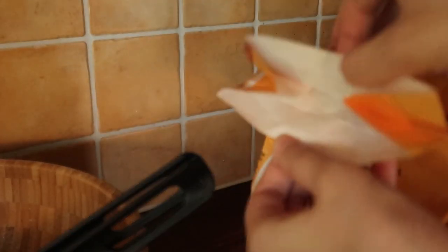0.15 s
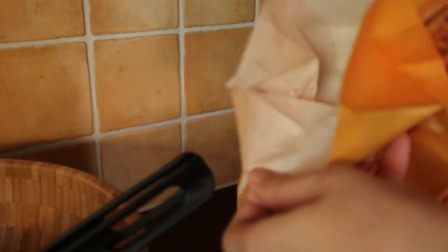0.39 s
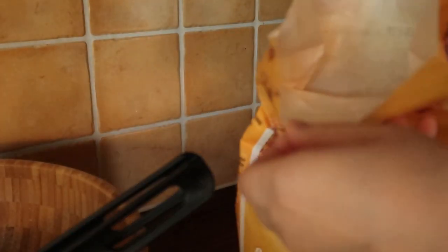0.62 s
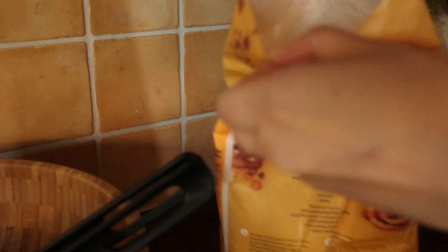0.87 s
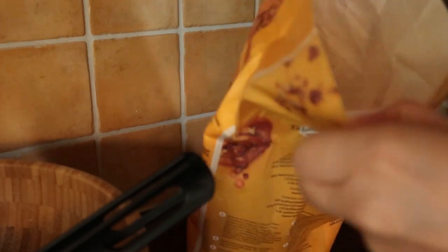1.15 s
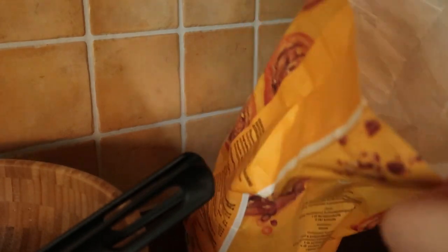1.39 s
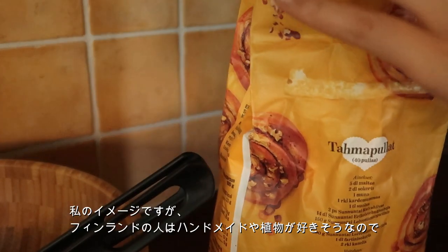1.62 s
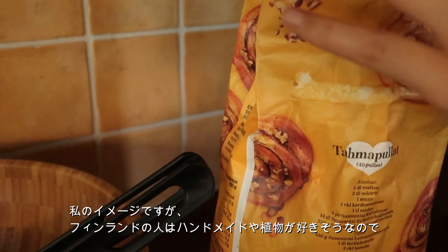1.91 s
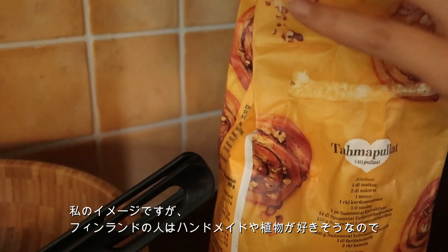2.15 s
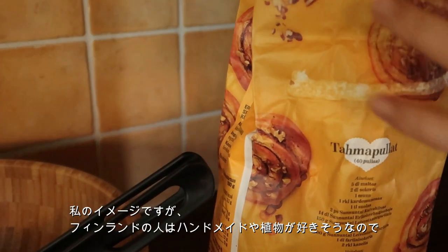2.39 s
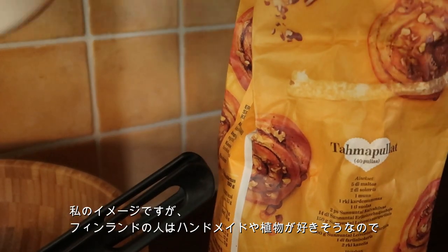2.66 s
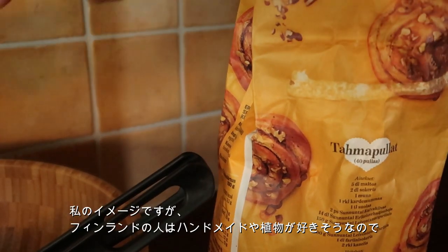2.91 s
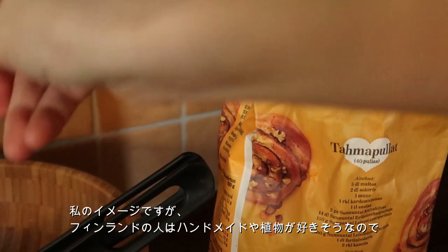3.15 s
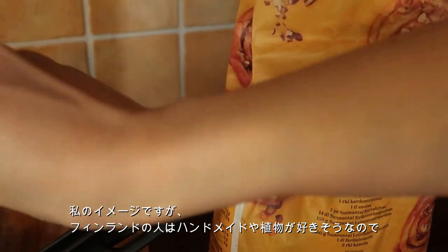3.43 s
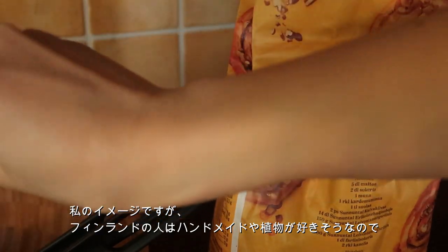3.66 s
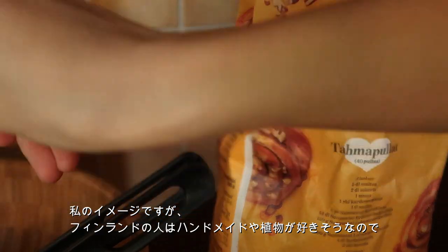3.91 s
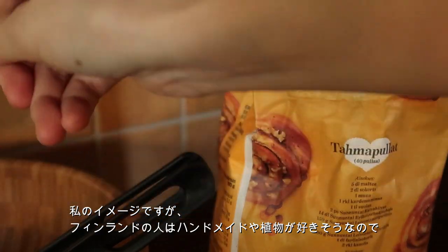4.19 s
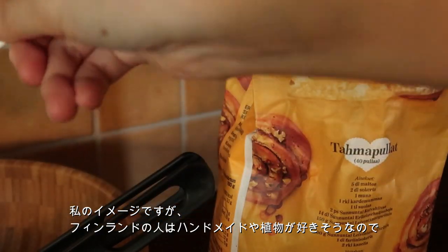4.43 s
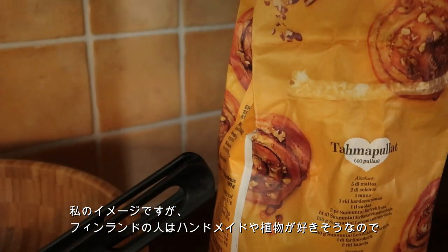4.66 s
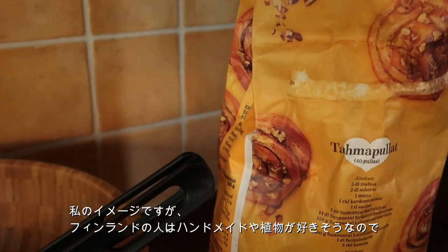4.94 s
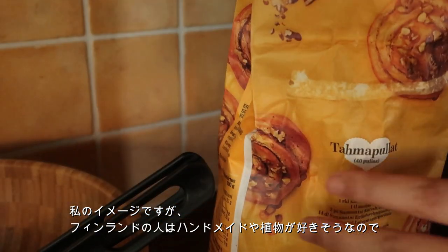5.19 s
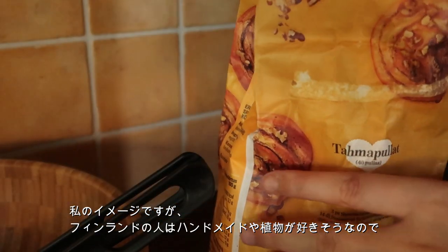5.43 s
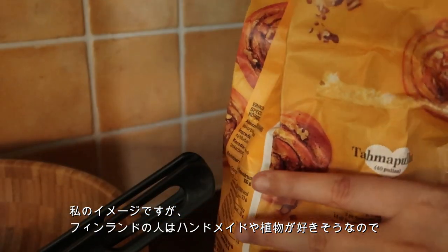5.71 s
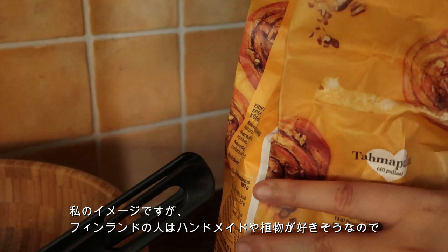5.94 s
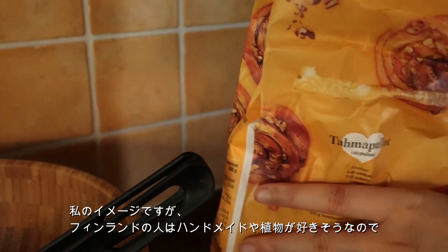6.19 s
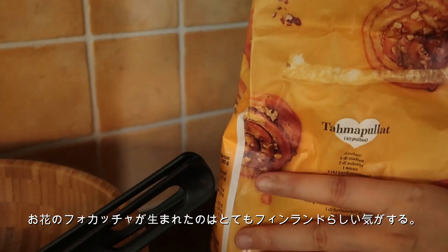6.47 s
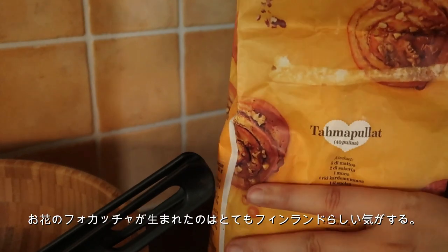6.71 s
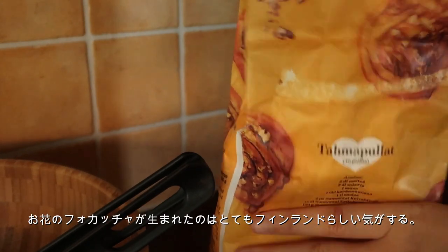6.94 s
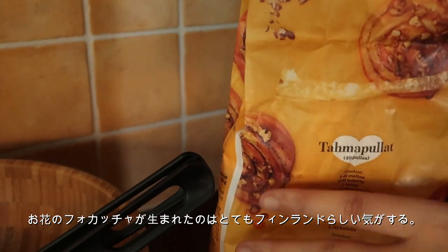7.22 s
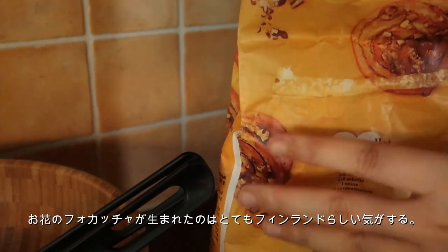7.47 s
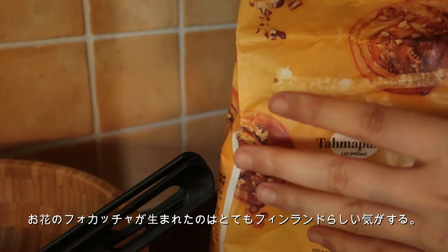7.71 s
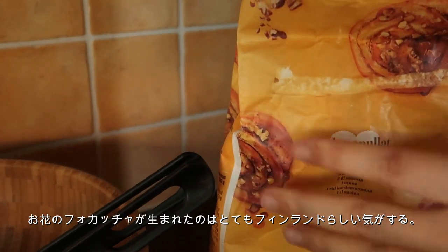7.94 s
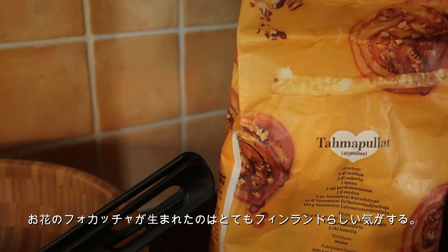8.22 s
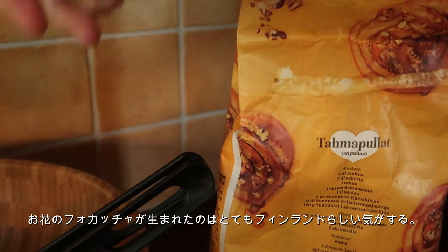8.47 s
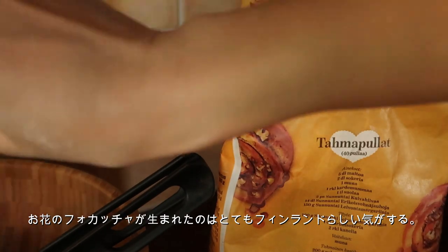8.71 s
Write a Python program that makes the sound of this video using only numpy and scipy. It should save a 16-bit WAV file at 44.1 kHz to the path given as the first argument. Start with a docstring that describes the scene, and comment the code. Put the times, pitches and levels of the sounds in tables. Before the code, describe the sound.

Crisp paper bag rustling with soft worktop knocks, a faint metal rattle, a quiet lull, renewed crackling and a short scoop scrape in a humming kitchen.

```python
"""Throughout, an appliance hums under microphone hiss in a small tiled kitchen: sines over bands of noise.
From the start, hands open, pat and squeeze a stiff paper flour bag close by: noise bursts and ringing
panels for the creases, clicked modes for the crackle, narrow noise for skin on paper. Soft knocks go
through the worktop as decaying sines; past 2 s a metal utensil rattles faintly, then a lull, and from
5 s the bag is worked again. From 8 s a scoop is scraped: friction noise through resonances."""
import sys
import numpy as np
from scipy import signal
from scipy.io import wavfile

SR = 44100
rng = np.random.default_rng(int(sys.argv[2]) if len(sys.argv) > 2 else 0)


def file_out(sig):
    """Save sig as 16-bit WAV at sys.argv[1]."""
    # one column per channel
    cols = np.atleast_2d(sig).T
    # limit, then scale
    lim = np.clip(cols, -1, 1)
    pcm = np.round(lim * 32767).astype(np.int16)
    wavfile.write(sys.argv[1], SR, pcm)


def invert_db(level):
    """Linear amplitude ratio for a level in decibels (20 dB per decade), elementwise."""
    return 10 ** (np.asarray(level, dtype=float) / 20)


N = 390285


def rms_one(x):
    """Scale to unit rms."""
    return x / np.sqrt(np.mean(x ** 2) + 1e-20)


def in_time(rows):
    """Columns of a curve table at every sample, -120 dB outside it."""
    s, *columns = np.transpose(rows)
    t = np.arange(N) / SR
    return np.array([np.interp(t, s, column, left=-120, right=-120) for column in columns])


def at_hz(points, hz):
    """Read a table on a log-frequency axis."""
    table_hz, values = np.array(points).T
    return np.interp(np.log(hz), np.log(table_hz), values)


def drift(rate_hz):
    """Slow random wander of rms 1: noise through a double pole, run at every 40th sample."""
    r = np.exp(-80 * np.pi * rate_hz / SR)
    white = rng.standard_normal(N // 40 + 2002)
    slow = signal.lfilter([1], [1, -2 * r, r * r], white)[2000:]
    return np.interp(np.arange(N) / 40, np.arange(len(slow)), rms_one(slow))


def dying(power, t60_s):
    """Each burst of power fades by 60 dB in t60_s."""
    return signal.lfilter([1], [1, -invert_db(-120 / (t60_s * SR))], power + 1e-18)


def ring(clicks, hz, t60_s):
    """A unit click sets a decaying sine of height 1 ringing."""
    r, w = invert_db(-60 / (t60_s * SR)), 2 * np.pi * hz / SR
    return signal.lfilter([0, np.sin(w)], [1, -2 * r * np.cos(w), r * r], clicks + 1e-18)


def across(hz, sub, boom, body, crisp, sizzle, top):
    """Level at one pitch, between levels given from the deepest range to the highest."""
    centres_hz = [55, 170, 900, 3800, 9000, 15000]
    weights = [np.interp(np.log(hz), np.log(centres_hz), row) for row in np.eye(6)]
    return np.dot(weights, [sub, boom, body, crisp, sizzle, top])


def banded(envelope_at, side_table):
    """Half-octave bands of noise, each under its own envelope, with a side signal of its own."""
    out, white = 0, rng.standard_normal((2, 2, N))
    edges_hz = 28 * 2 ** np.arange(0, 9.1, 1 / 2)
    for k, (low_hz, high_hz) in enumerate(zip(edges_hz, edges_hz[1:])):
        hz = np.sqrt(low_hz * high_hz)
        unit = np.sqrt(SR / 2 / (high_hz - low_hz))     # rms 1 in every band
        band = signal.butter(2, [low_hz, high_hz], "band", fs=SR, output="sos")
        mid, side = signal.sosfilt(band, unit * white[k % 2] * envelope_at(hz))
        out = out + mid + invert_db(at_hz(side_table, hz)) * side * [[1], [-1]]
    return out


# Air and hiss spectrum. Each row: frequency in Hz, relative density in dB.
ROOM_TONE = [(15, -43), (25, -4.5), (53, -12.5), (69, -7), (101, -3.5), (126, -4.5), (156, 1), (173, -17),
             (193, -2), (331, -6), (359, -2.5), (482, -14.5), (722, -12), (5880, -26), (15500, -48.5)]
# Stereo width of room tone. Each row: frequency in Hz, side relative to mid in dB.
FAR_SIDE = [(60, -29), (180, -7.5), (550, 0), (1650, 0.5), (4970, 0), (15000, 1.5)]
# Steady hum lines. Each row: frequency in Hz, level in dB.
HUM = [(49.7, -62.5), (149, -65.5), (200, -69), (362, -68.5)]
# Swelling hum line. Each row: time in seconds, level in dB.
DRONE = [(0, -57.5), (2.4, -65), (2.8, -61), (3.4, -63), (4.0, -58), (5.1, -57.5), (5.6, -60), (8.86, -65)]


def room_tone(level_db=-56, drone_hz=103.3):
    """Air and microphone hiss as noise bands; appliance hum as sines wavering in level and phase."""
    def envelope_at(hz):
        """Density times root of frequency gives a half-octave level."""
        return invert_db(at_hz(ROOM_TONE, hz) + 1.0 * drift(6.1)) * np.sqrt(hz)

    air = banded(envelope_at, FAR_SIDE)
    t = np.arange(N) / SR
    hum = 0
    for hz, line_db in HUM + [(drone_hz, in_time(DRONE)[0])]:
        level = np.sqrt(2) * invert_db(line_db + 2.6 * drift(5.0))
        hum = hum + level * np.sin(2 * np.pi * hz * t + 2.16 * drift(1.0))
    return invert_db(level_db) * air / np.std(air.mean(axis=0)) + hum


# Hands working the bag, one list a handling.
# Each row: time in seconds, crumple in dB, skin rub in dB, bag wall boom in dB.
HANDLING = [
    [(0.0, -39, -55, -49), (0.13, -51, -50, -48), (0.26, -34, -45, -45), (0.396, -37.5, -47, -52),
     (0.44, -27.5, -65, -42), (0.5, -38, -37, -47), (0.542, -34.5, -44.5, -47.5), (0.65, -42.5, -65, -45),
     (0.73, -34, -65, -37), (0.77, -32, -51, -40), (0.81, -39, -57, -32), (0.86, -30, -60, -42),
     (0.906, -27, -54, -29), (1.02, -33.5, -49, -52), (1.156, -45, -67, -41.5), (1.314, -50, -67, -52),
     (1.454, -50, -84, -51), (1.548, -47.5, -64, -43), (1.634, -50, -59, -64), (1.754, -53.5, -69, -57),
     (1.95, -68.5, -68, -67)],
    [(1.95, -42, -75, -33.5), (1.966, -59, -81, -37), (2.018, -55, -51.5, -56), (2.12, -73, -94, -56.5)],
    [(2.17, -74, -98, -73), (2.258, -49, -41, -39.5), (2.28, -60, -66, -50), (2.45, -68, -80, -74)],
    [(3.4, -95, -94, -69), (3.55, -70.5, -92.5, -57), (3.575, -53, -80, -45), (3.65, -65.5, -86, -46.5),
     (3.772, -98, -92, -59), (3.792, -63, -85.5, -70.5), (3.948, -83, -96, -59), (4.1, -82, -94.5, -78)],
    [(5.22, -75, -102, -64.5), (5.236, -71, -84, -52), (5.252, -70, -72, -48), (5.258, -55, -49, -46),
     (5.272, -59, -49, -43), (5.284, -64, -69, -57), (5.292, -50, -49, -62), (5.325, -56, -56, -54),
     (5.335, -66, -66, -56), (5.37, -78, -76, -45)],
    [(5.37, -74, -71, -54), (5.42, -42, -48, -37), (5.49, -45.5, -42, -32), (5.584, -33.5, -40.5, -37),
     (5.646, -33.5, -38, -31.5), (5.794, -32.5, -45, -40), (5.89, -40.5, -54, -44)],
    [(5.89, -42.5, -53, -53), (6.02, -32.5, -42, -48), (6.12, -31, -55, -56), (6.18, -27.5, -47.5, -25),
     (6.38, -40.5, -43.5, -50), (6.58, -40.5, -46.5, -45), (6.78, -32, -39.5, -33.5),
     (6.94, -36.5, -48, -47), (7.01, -31.5, -37.5, -35), (7.12, -30.5, -36, -36.5), (7.2, -42.5, -58, -46),
     (7.29, -50, -50.5, -50), (7.33, -53, -63, -45), (7.38, -45.5, -49.5, -45), (7.41, -46, -57, -33),
     (7.63, -40.5, -62, -49), (7.69, -37, -73, -42), (7.78, -44.5, -51.5, -36.5), (7.83, -48.5, -58, -48),
     (8.0, -69, -101, -65)],
    [(8.68, -77, -82, -70), (8.704, -62.5, -99, -61.5), (8.85, -53, -92.5, -50)],
]
HANDS = [np.max([in_time(rows)[c] for rows in HANDLING], axis=0) for c in range(3)]


def pressure_db(hz):
    """How hard the hands work the bag, as a level at one pitch through time."""
    crumple, rub, boom = HANDS
    return across(hz, boom - 14, boom - 5, crumple, .5 * (crumple + rub), rub - 3, rub - 16)


# Modes of the bag walls. Each row: frequency in Hz, width in Hz, relative level in dB.
BAG = [(204.4, 96, 7), (305, 36, 1), (418, 60, 1), (554, 93, -12), (696, 243, -6.5), (830, 65, -5),
       (980, 290, -10.5), (1200, 35, -9), (1310, 99, -6), (1510, 42, -6.5), (1800, 83, 3.5), (2040, 94, -1),
       (2400, 160, -5.5), (2746, 300, 1), (3224, 110, 2), (4066, 170, -3.5), (4600, 510, 1), (5700, 270, 1),
       (6320, 450, -22.5), (7990, 1520, -10.5), (11630, 230, 6)]
# Stereo width of the bag. Each row: frequency in Hz, side relative to mid in dB.
NEAR_SIDE = [(60, -44), (180, -59), (550, -24.5), (1650, -18), (4970, -5.5), (15000, 3)]


def crackle(crackle_db=-4, shifting_db=4):
    """Clumped small creases each strike about a third of the bag's modes, which wax and wane as it bends."""
    rate_per_s = 700 * invert_db(5 * drift(12))
    born = np.flatnonzero(rng.random(N) < rate_per_s / SR)
    sizes = invert_db(3 * np.minimum(rng.exponential(1, len(born)), 3))
    out = 0
    for hz, width_hz, mode_db in BAG:
        clicks = np.zeros((2, N))
        struck = rng.random(len(born)) < 1 / 3
        force_db = (pressure_db(hz) + shifting_db * drift(4.2))[born]
        kicks = sizes * struck * rng.standard_normal((2, len(born)))
        clicks[:, born] = kicks * invert_db(force_db + crackle_db + mode_db)
        mid, side = ring(clicks, hz, np.log(1000) / (np.pi * width_hz))
        out = out + mid + invert_db(at_hz(NEAR_SIDE, hz)) * side * [[1], [-1]]
    return out


# Fingertip strokes. Each row: start in seconds, length in seconds, level in dB.
SLIDES = [(5.253, 0.021, -54.5), (5.291, 0.039, -53), (5.43, 0.038, -49), (5.47, 0.053, -48),
          (7.36, .05, -58), (7.697, .016, -43), (7.75, .018, -47), (7.782, 0.021, -50)]


def fingertips(hz=3300, half_width_hz=180, slide_db=-17, edge_s=.003):
    """Skin sliding on coated paper excites one narrow wall mode, a little always and clearly in strokes."""
    band = signal.butter(2, [hz - half_width_hz, hz + half_width_hz], "band", fs=SR, output="sos")
    slide = rms_one(signal.sosfilt(band, rng.standard_normal(N)))
    t = np.arange(N) / SR
    strokes = 0
    for s, length_s, level_db in SLIDES:
        gate = np.clip(np.minimum(t - s, s + length_s - t) / edge_s, 0, 1)
        strokes = strokes + invert_db(level_db) * gate
    always_db = pressure_db(hz) + slide_db + 1.9 * drift(15) + 3.2 * drift(2)
    return slide * (strokes + invert_db(always_db))


# Loud creases snapping. Each row: time in seconds, body in dB, panel ring in Hz, thump in dB,
# crisp in dB, sizzle in dB.
SNAPS = [(0.158, -54, 4160, -36, -29.5, -55), (0.194, -40, 3900, -45, -28, -38),
         (0.2, -35, 775, -41, -26, -33), (0.214, -25, 1530, -24.5, -13.5, -28.5),
         (0.232, -31.5, 1220, -35, -22, -27), (0.241, -24.5, 434, -28, -12, -38),
         (0.271, -21, 1030, -20, -36, -38.5), (0.279, -43, 1120, -31, -12, -31),
         (0.315, -25, 1630, -51, -32, -52), (0.320, -15, 2000, -54, -25.5, -52),
         (0.337, -23, 1080, -46, -21, -25), (0.402, -30, 700, -38, -40, -55),
         (0.405, -36, 3220, -33, -34, -56), (0.428, -17.5, 404, -27, -18.5, -40.5),
         (0.459, -28.5, 1740, -24.5, -20, -50), (0.464, -8.5, 915, -37, -16, -31),
         (0.477, -22, 1660, -14, -14.5, -24), (0.493, -21, 1270, -32, -6, -12.5),
         (0.52, -23.5, 855, -52, -22, -49), (0.572, -25, 830, -56, -38, -46),
         (0.588, -21.5, 695, -39, -57, -61), (0.67, -32.5, 1580, -39, -24, -58),
         (0.676, -30.5, 380, -23.5, -38, -54), (0.717, -14.5, 940, -21, -15.5, -45.5),
         (0.735, -19.5, 520, -21, -34, -48), (0.743, -28, 1200, -35, -18, -30),
         (0.764, -15.5, 1750, -16.5, -22, -29.5), (0.81, -21, 714, -22, -20.5, -60),
         (0.85, -14.5, 393, -33.5, -22, -55), (0.88, -19.5, 1480, -25, -20, -61),
         (0.896, -8, 450, -12, -10, -21.5), (0.908, -13, 1200, -29, -21, -34.5),
         (0.915, -17.5, 484, -14, -8, -29.5), (0.921, -11, 880, -21, -2.5, -11.5),
         (0.930, -27, 1110, -30, -12.5, -18.5), (0.954, -24.5, 410, -43.5, -28, -38.5),
         (1.002, -40, 993, -63, -20, -38), (1.078, -29, 1200, -39, -42, -65),
         (1.091, -26, 845, -60, -25.5, -32), (1.184, -30.5, 830, -23, -27, -44),
         (1.194, -33, 1490, -45, -33, -54), (1.217, -35, 970, -31, -23.5, -34.5),
         (1.342, -37.5, 664, -35, -33.5, -42), (1.377, -28, 950, -40, -31, -67),
         (1.393, -44, 1520, -41, -36, -68), (1.458, -34, 1150, -29, -43, -72),
         (1.5, -39, 790, -38, -37, -52), (1.592, -33, 1430, -55, -50, -65),
         (1.625, -24, 2090, -31, -29, -30.5), (1.755, -29.5, 2040, -54.5, -37.5, -57),
         (2.242, -50, 3400, -55, -52, -55), (2.249, -38, 1700, -45, -43.5, -49),
         (2.256, -25, 2400, -38.5, -32, -43), (3.557, -59, 2500, -63, -59, -65),
         (3.577, -51, 1720, -54, -48, -62), (3.6, -49, 1400, -54, -56, -69.5),
         (5.401, -35, 1297, -16, -42, -52), (5.412, -21, 1200, -28, -23, -23),
         (5.484, -18, 650, -16.5, -19.5, -37), (5.497, -18, 1190, -38, -25.5, -36),
         (5.552, -15, 1800, -12, -18, -21.5), (5.595, -14.5, 424, -13.5, -10.5, -34),
         (5.604, -18.5, 428, -10.5, -18.5, -28), (5.637, -23, 3300, -21, -18.5, -43),
         (5.657, -33, 1900, -36, -26, -32), (5.710, -22, 1430, -39, -12.5, -21.5),
         (5.741, -18, 1750, -35, -17.5, -23), (5.769, -10, 487, -23.5, -13, -28.5),
         (5.781, -18, 554, -36, -39, -47), (5.833, -21.5, 766, -26, -25, -54),
         (5.921, -34, 1800, -47, -28, -57), (5.939, -17.5, 325, -22, -23, -62),
         (5.965, -27, 890, -24, -30, -55), (5.976, -23, 830, -17, -16, -32.5),
         (6.011, -21, 1960, -14.5, -14.5, -18), (6.038, -31, 1260, -42, -17, -50),
         (6.074, -37, 850, -7, -17, -33), (6.081, -39.5, 1500, -32, -20, -46.5),
         (6.101, -28, 3120, -33, -33, -52.5), (6.105, -18.5, 340, -13, -18, -45),
         (6.112, -13.5, 1750, -23, -22.5, -39), (6.129, -20, 830, -30, -29, -45),
         (6.146, -15, 1170, -31, -15.5, -29), (6.163, -28, 890, -22, -18, -38),
         (6.177, -13.5, 1750, -10, -20, -20), (6.204, -21, 874, -12, -19, -41),
         (6.227, -19, 2600, -18, -18, -24), (6.26, -26, 840, -59, -12, -22),
         (6.351, -24, 1160, -23, -15.5, -9.5), (6.377, -24, 3500, -29, -18.5, -22),
         (6.4, -25, 790, -38, -34, -41), (6.481, -28, 1700, -58, -31, -39),
         (6.517, -33, 1280, -56, -27, -33), (6.524, -20, 1400, -67, -34, -43),
         (6.558, -19.5, 403, -61, -21.5, -39), (6.589, -50, 373, -37, -23, -46),
         (6.616, -30, 1090, -45, -34, -50), (6.63, -14, 443, -36, -14.5, -71),
         (6.704, -19.5, 332, -31, -31, -52), (6.738, -19, 1750, -26, -36, -35),
         (6.745, -18.5, 1050, -15, -12.5, -23), (6.764, -26, 1180, -30, -16, -30.5),
         (6.785, -10.5, 375, -31, -12.5, -41), (6.805, -18, 1500, -38, -18, -38.5),
         (6.815, -13.5, 1150, -36, -18.5, -21), (6.827, -42, 1130, -36, -16, -31),
         (6.884, -13, 1860, -54, -27.5, -52), (6.947, -25, 1430, -13, -25, -30),
         (6.962, -16, 870, -74, -10, -23), (7.029, -9.5, 1500, -48, -19, -33),
         (7.034, -9, 411, -19, -24, -37), (7.043, -17.5, 665, -60, -14, -30),
         (7.088, -40, 3300, -47, -23, -29), (7.099, -45, 1610, -40, -27, -34),
         (7.141, -20, 1310, -48, -35, -52), (7.211, -23.5, 1880, -76, -34.5, -51),
         (7.429, -25.5, 1360, -21, -29, -64), (7.473, -17.5, 393, -44, -18.5, -27),
         (7.503, -31, 1410, -39, -36, -46), (7.563, -22, 1650, -27, -21, -60),
         (7.650, -11.5, 413, -29, -27.5, -49), (7.702, -41, 3220, -52, -48, -39),
         (7.734, -54, 1510, -51.5, -46, -43)]


def creases(slips_per_s=24, spread_db=3, dull_db=8.5, colour_db=5, crisp_share=0.39, crisp_db=2):
    """The loud snaps and the lesser slips, which come at random and grow with the hands' effort."""
    chance = rng.random((int(slips_per_s * N / SR), 5))
    s = chance[:, 0] * (N / SR - .1)
    crumple, rub, boom = (level[(s * SR).astype(int)] for level in HANDS)
    size = -spread_db * np.log(1 - .95 * chance[:, 1])
    bass, treble = colour_db * (2 * chance[:, 3:].T - 1)
    body = crumple + size
    ring_hz = 400 * 2 ** (3.2 * chance[:, 2])
    sizzle = rub + size + treble - dull_db
    crisp = body + crisp_share * (sizzle - body) + crisp_db     # between body and treble
    slips = [s, body, ring_hz, boom + size + bass, crisp, sizzle]
    return np.hstack([np.transpose(SNAPS), slips])


# Decay of the paper. Each row: frequency in Hz, T60 in seconds.
SNAP_T60 = [(100, 0.39), (300, 0.046), (1000, 0.071), (2500, 0.053), (5000, 0.057), (12000, 0.008)]
# Decay of the kitchen. Each row: frequency in Hz, T60 in seconds.
KITCHEN_T60 = [(100, 1), (1000, 0.17), (4000, 0.44), (12000, 0.046)]


def paper(snaps, rub_db=-6, wet_db=-14, follow_db=-15, follow_s=0.014, rise_t60_s=0.006,
          crack_db=8.5, crack_t60_s=0.0057):
    """Each snap and the smaller slips after it set every band of the sheet rattling; the room prolongs it."""
    s, body, ring_hz, thump, crisp, sizzle = snaps
    chance = rng.random((len(s), 6))
    late = s[:, None] + follow_s * chance[:, :3]
    weaker_db = follow_db - 8 * chance[:, 3:]

    def envelope_at(hz):
        """Rattle of one band over the rub of the hands."""
        colour_db = 2.5 * rng.standard_normal((len(s), 4))
        level_db = across(hz, thump - 22, thump - 5, body - 5, crisp - 2.5, sizzle - .1, sizzle - 14)
        level_db -= 6.15 * np.minimum(abs(np.log2(hz / ring_hz)), 2)      # strongest near the panel's pitch
        kicks = np.zeros(N)
        kicks[(late * SR).astype(int)] = invert_db(level_db[:, None] + weaker_db + colour_db[:, 1:]) ** 2
        kicks[(s * SR).astype(int)] = invert_db(level_db + colour_db[:, 0]) ** 2
        # a crease gives way over a moment
        kicks = dying(kicks, rise_t60_s) * (1 - invert_db(-120 / (rise_t60_s * SR)))
        crack = invert_db(crack_db) ** 2 * dying(kicks, crack_t60_s)
        direct = dying(kicks, at_hz(SNAP_T60, hz)) + crack
        room_t60_s = at_hz(KITCHEN_T60, hz)
        echo = dying(direct, room_t60_s) * invert_db(wet_db) ** 2 * 6 * np.log(10) / (room_t60_s * SR)
        rub = invert_db(pressure_db(hz) + rub_db + 2.0 * drift(7.4))
        return np.sqrt(direct + echo + rub ** 2)

    return banded(envelope_at, NEAR_SIDE)


def panels(snaps, ring_db=-4, ping_db=-8, ping_t60_s=0.0144, ring_s=0.02, ring_cycles=10.0):
    """The panel by each crease rings, a weaker neighbour mode beating on it; the edge adds a high ping."""
    out, t = np.zeros(N + 4000), np.arange(4000) / SR
    chances = rng.random((len(snaps[0]), 3))
    for (s, body, hz, thump, crisp, sizzle), chance in zip(np.transpose(snaps), chances):
        i = int(s * SR)
        level_db = body if hz < 2500 else crisp
        neighbour_hz = hz * (0.615 + 0.57 * chance[1])
        pair = np.sin(2 * np.pi * hz * t) + chance[0] * np.sin(2 * np.pi * neighbour_hz * t)
        ping = np.sin(2 * np.pi * 3000 * 2 ** (1.2 * chance[2]) * t)
        t60_s = ring_s + ring_cycles / hz
        out[i:i + len(t)] += invert_db(level_db + ring_db - 60 * t / t60_s) * pair
        out[i:i + len(t)] += invert_db(crisp + ping_db - 60 * t / ping_t60_s) * ping
    return out[:N]


# Soft knocks of hands and bag. Each row: time in seconds, thud level in dB, crack level in dB, thud in Hz.
KNOCKS = [(0.679, -19.5, -52, 166), (0.798, -14.5, -26, 190), (1.502, -27, -34, 280),
          (1.956, -28, -47, 221), (2.228, -42, -37.5, 202), (2.258, -32.5, -48, 267),
          (2.279, -39.5, -52, 150), (3.522, -41, -65, 130), (3.545, -45, -55, 253),
          (3.564, -24, -34.5, 187), (3.607, -30.5, -47, 139), (3.614, -32.5, -55, 600),
          (3.666, -44, -61, 150), (3.697, -41.5, -65.5, 132), (3.901, -40.5, -54, 216),
          (3.933, -38.5, -67, 124), (5.934, -24.5, -37, 283), (6.694, -12, -51, 226),
          (7.882, -32, -60, 98.3), (8.782, -34.5, -45, 231), (8.821, -38.5, -61, 145)]
# Worktop modes. Each row: frequency in Hz, relative level in dB, T60 in seconds.
WORKTOP = [(104, -8.5, 0.081), (148.2, 2, 0.135), (255, 3, 0.047), (356, -3, 0.14), (567, -6, 0.082)]


def knocks(thud_cycles=24.7):
    """A padded contact gives a low thud, strikes the worktop modes and leaves a dull crack."""
    out, t = np.zeros(N + 12000), np.arange(12000) / SR
    dull = signal.butter(2, [400, 2000], "band", fs=SR, output="sos")
    for s, thud_db, crack_db, thud_hz in KNOCKS:
        i, rise = int(s * SR), 1 - np.exp(-t / 0.0045)
        for hz, level_db, t60_s in WORKTOP + [(thud_hz, 4, thud_cycles / thud_hz)]:
            fade = invert_db(thud_db - 5.5 + level_db - 60 * t / t60_s)
            out[i:i + len(t)] += rise * fade * np.sin(2 * np.pi * hz * t)
        noise = rms_one(signal.sosfilt(dull, rng.standard_normal(len(t))))
        out[i:i + len(t)] += invert_db(crack_db - 60 * t / 0.11) * (1 - np.exp(-t / 0.0069)) * noise
    return out[:N]


# Utensil jolted. Each row: time in seconds, level in dB.
JOLTS = [(2.224, -67.5), (2.254, -62.5)]
# Utensil modes. Each row: frequency in Hz, relative level in dB, T60 in seconds.
UTENSIL = [(772, 6, 0.2), (1120, 5.5, .25), (1176, 1, 0.24), (1295, -2, 0.31), (1584, 2, 0.4),
           (1600, 6, 0.13), (1943, -4, 0.59), (2170, 4, .15), (2360, 3, 0.55), (2600, -3, 0.28),
           (2896, -3, 0.65), (3300, -6, 0.35), (3714, -8, 0.34), (4877, -4, .35), (5443, -10, .25)]


def utensil(rattle_s=.025):
    """A jolted metal utensil chatters in its holder; its modes come in close threes and flutter."""
    out = 0
    for hz, level_db, t60_s in UTENSIL:
        for detune in (.985, 1, 1.012):
            clicks = np.zeros(N)
            for s, jolt_db in JOLTS:
                late = np.arange(6) / 6 * rng.uniform(.5, 1.5, 6)     # in units of rattle_s
                heights = invert_db(jolt_db + 4 + level_db - 20.0 * late)
                clicks[((s + rattle_s * late) * SR).astype(int)] = heights * rng.choice([-1, 1], 6)
            out = out + ring(clicks, hz * detune, t60_s) * (1 + .6 * drift(40))
    return out


# Scrape through time. Each row: time in seconds, main rings in dB, low rings in dB, high rings in dB,
# broad scuff in dB.
SCRAPE = [(8.0, -76, -79, -77, -83), (8.03, -76, -86.5, -59.5, -84), (8.076, -60.5, -60, -55, -68),
          (8.11, -50, -64, -62, -77), (8.138, -39.5, -73, -68, -72), (8.19, -47, -68, -69, -73.5),
          (8.23, -50.5, -53, -69.5, -76), (8.31, -57.5, -62, -72.5, -80), (8.37, -67, -68, -76, -78),
          (8.44, -62, -61.5, -75, -76), (8.475, -60, -56, -74, -68), (8.51, -54, -60, -71, -56),
          (8.59, -61.5, -60.5, -69, -62), (8.66, -70, -67, -80.5, -68), (8.75, -72.5, -85.5, -82, -87)]
# Scoop resonances, one list a SCRAPE level. Each row: frequency in Hz, width in Hz, relative level in dB.
SCOOP = [
    [(2605, 410, -0.5), (2880, 220, 1), (3200, 260, -4.5)],
    [(1750, 440, -1), (2199, 150, -7)],
    [(3620, 450, -8.5), (4420, 300, -2.5)],
    [(3300, 2130, 0)],
]


def scoop(side_db=-9):
    """Fine uneven friction excites each group of rings; each ring is applied twice for steep flanks."""
    out = 0
    for rings, level_db in zip(SCOOP, in_time(SCRAPE)):
        for hz, width_hz, ring_db in rings:
            r = np.exp(-np.pi * width_hz / SR)
            section = [(1 - r * r) / 2, 0, (r * r - 1) / 2, 1, -2 * r * np.cos(2 * np.pi * hz / SR), r * r]
            friction = rng.standard_normal((2, N)) * invert_db(3 * drift(25))
            ringing = rms_one(signal.sosfilt([section, section], friction))
            mid, side = invert_db(ring_db + level_db) * ringing
            out = out + mid + invert_db(side_db) * side * [[1], [-1]]
    return out


def scene():
    """All sources, nearly centred; a small bag radiates little deep bass."""
    snaps = creases()
    bag = paper(snaps) + crackle() + panels(snaps) + fingertips()
    bag = signal.sosfilt(signal.butter(2, 103, "high", fs=SR, output="sos"), bag)
    balance = invert_db([[-.15], [.15]])     # left, right
    return (bag + knocks() + utensil() + scoop()) * balance + room_tone()


def band_limit(x):
    """A steep low-pass at the top of the band."""
    return signal.sosfilt(signal.butter(12, 16490, fs=SR, output="sos"), x)


def record(dry):
    """The top is cut at 15.9 kHz and loud peaks are rounded."""
    cut = signal.sosfilt(signal.cheby2(10, 60, 15900, fs=SR, output="sos"), dry)
    mix = 0.74 * np.tanh(cut / 1.283)
    return band_limit(mix)


dry = scene()
out = record(dry)
file_out(out)
```